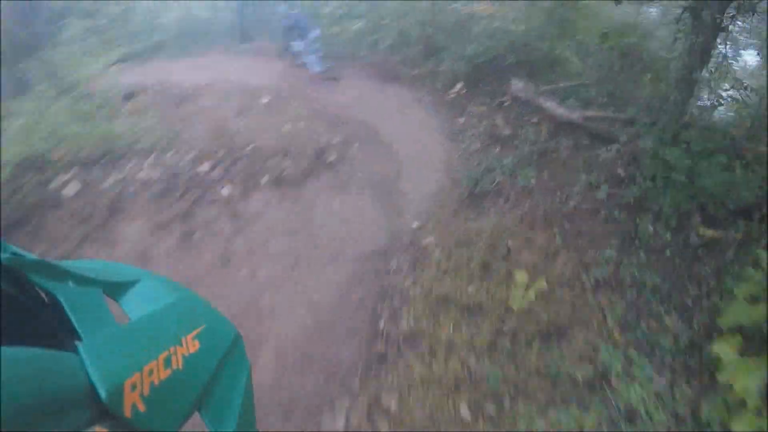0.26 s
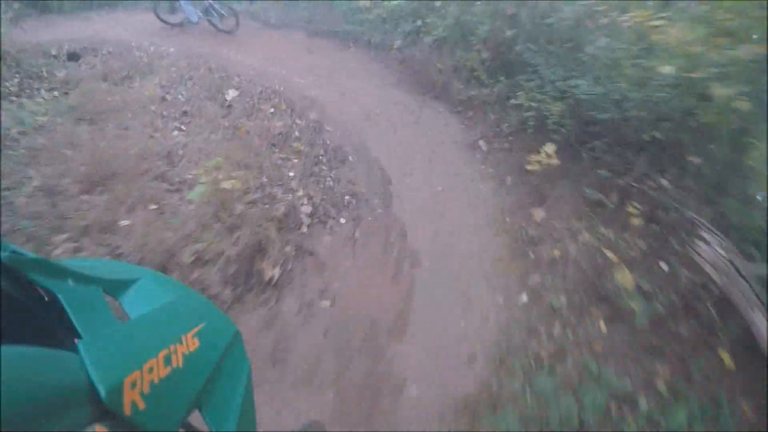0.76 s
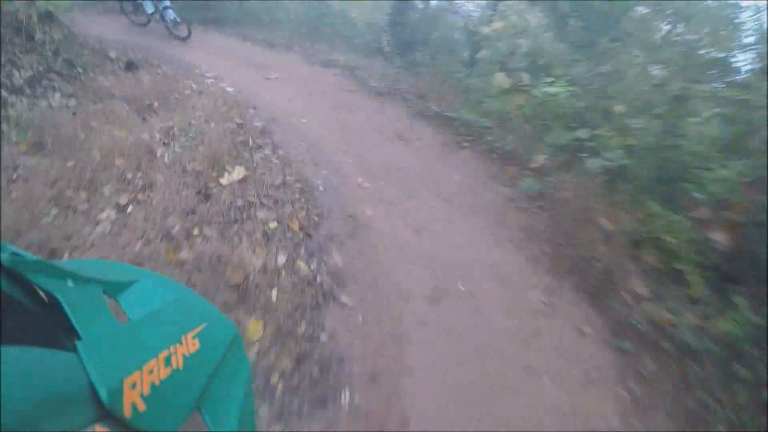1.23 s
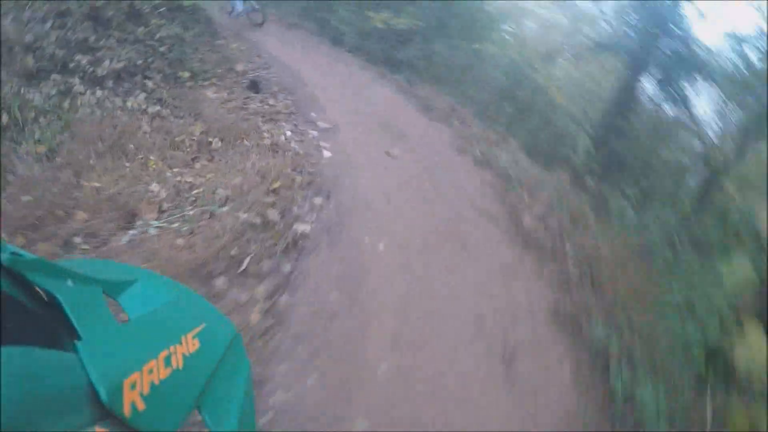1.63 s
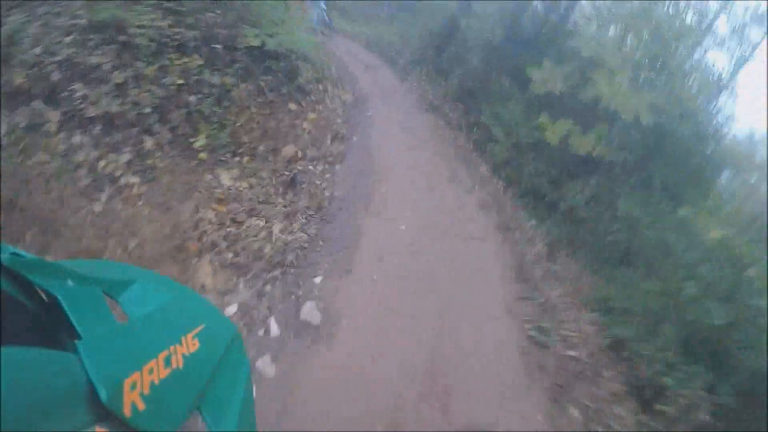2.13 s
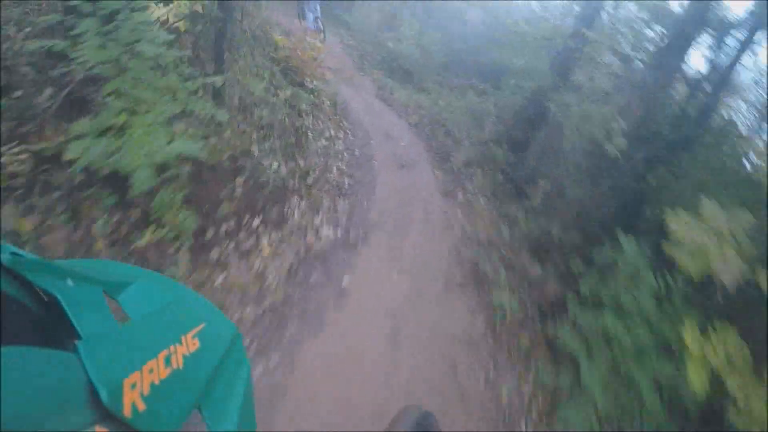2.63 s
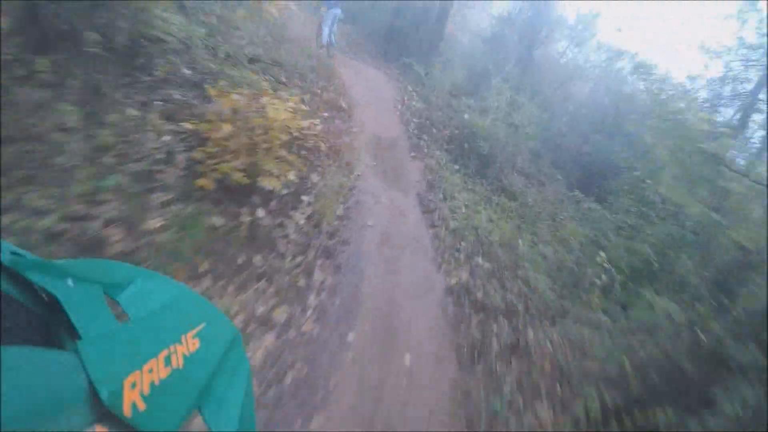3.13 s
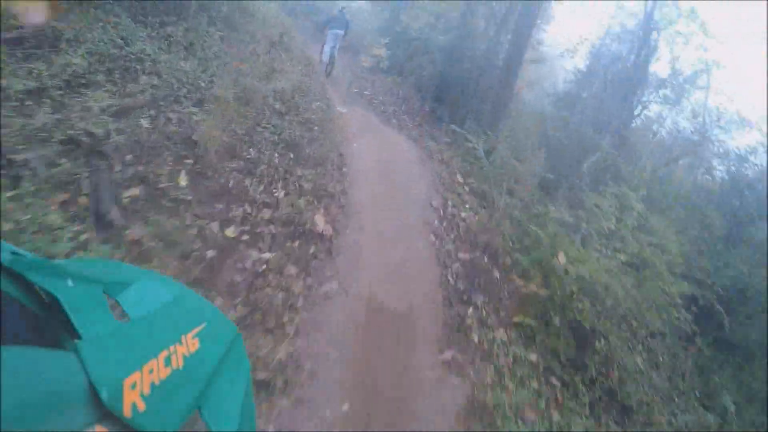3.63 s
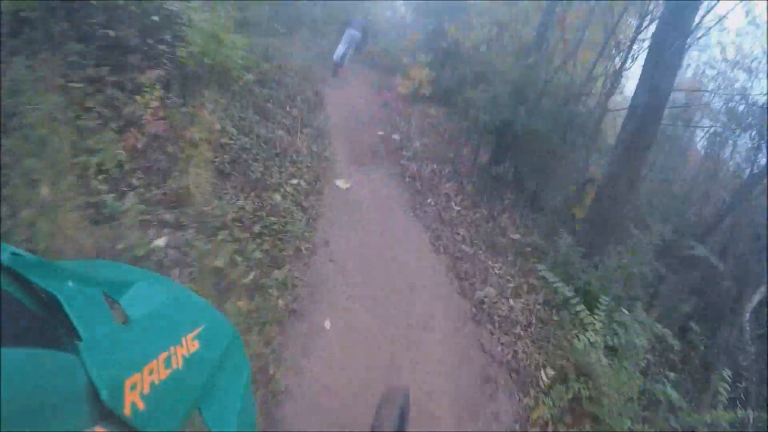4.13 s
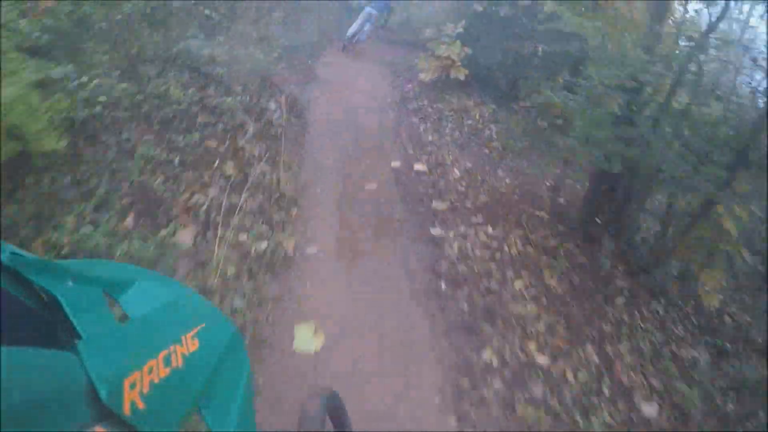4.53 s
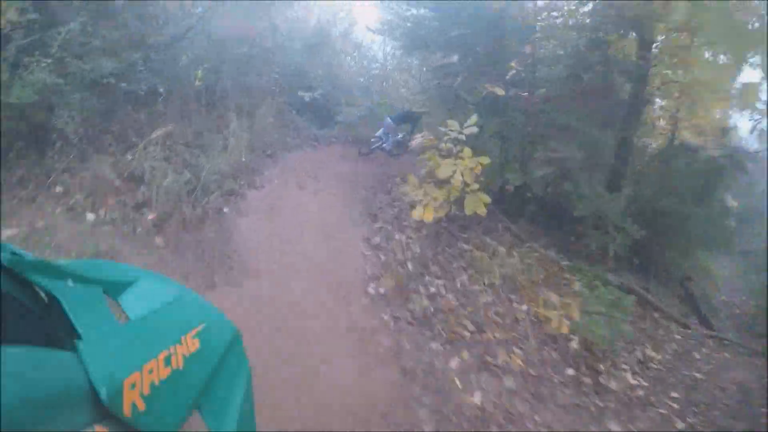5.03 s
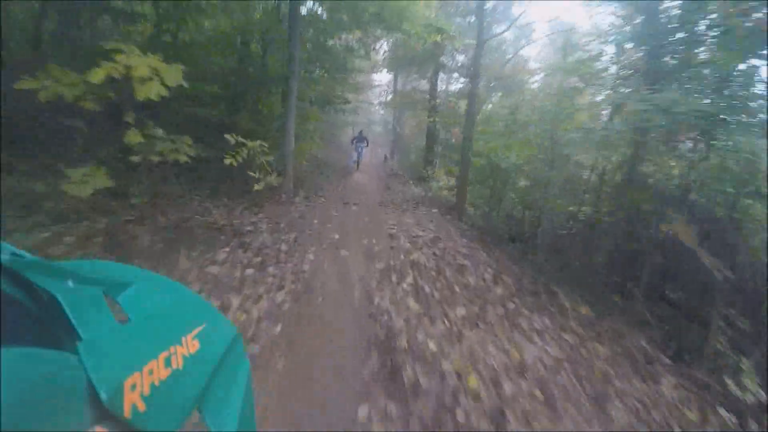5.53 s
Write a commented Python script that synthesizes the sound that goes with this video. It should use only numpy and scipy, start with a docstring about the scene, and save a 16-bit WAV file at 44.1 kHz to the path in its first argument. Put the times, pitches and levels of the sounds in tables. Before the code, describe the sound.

Deep wind buffeting and irregular knocks of a plastic camera case on a coasting mountain bike, the air rush slowly growing louder.

```python
"""Coasting down a dirt trail

A bike is heard from a camera sealed in a plastic case on the rider's helmet. Wind and bumps shake the
helmet in deep throbs. Rushing air and knocks of the mount make the case ring, while the freehub (the
ratchet in the back wheel) ticks softly. Near the end the sound drops out for a moment."""
import sys
import numpy as np
from scipy import signal
from scipy.fft import rfft, irfft, next_fast_len
from scipy.io import wavfile
from scipy.ndimage import uniform_filter1d

SR = 44100
rng = np.random.default_rng(int(sys.argv[2]) if len(sys.argv) > 2 else 0)


def dump_mix(stems):
    """Bounce the given channels to the path in sys.argv[1] as a 16-bit WAV at rate SR."""
    frames = np.atleast_2d(stems).T  # one column per channel
    limited = np.clip(frames, -1, 1)  # hard clip at full scale
    pcm = np.round(limited * 32767).astype(np.int16)
    wavfile.write(sys.argv[1], SR, pcm)


N = 254442

# Knocks of the mount. Hardness lifts the middle and top notes of the case, tone tilts its low notes
# upward, brightness lifts only the top: (time [s], level [dB], hardness [dB], tone [dB], brightness [dB])
MOUNT_KNOCKS = [(0.0102, -25.5, -25, 6, -3), (0.06, -23, -13, 1, -3), (0.1178, -26.5, -11, 2, -3),
                (0.1567, -22.5, -14.5, -4, 1), (0.191, -36, -23, 2, -3), (0.297, -22, -5, -10, -5),
                (0.3496, -30, -17, 9, -3), (0.3844, -28, 7, 8, 7), (0.3881, -17, 7, 7, 6.5),
                (0.3934, -26, -20, 7, -3), (0.4144, -27.5, -3, 13, -6), (0.418, -30.5, -17, 3, -1),
                (0.485, -25, -14, 11, -6), (0.579, -40.5, 4, 0, -12), (0.602, -31, -15, 12, -3),
                (0.834, -33.5, -5, -2, -6), (0.865, -41.5, 2, 3, -9), (0.905, -31.5, -4, -2, -9),
                (0.955, -32, -19, 3, -3), (1.0127, -35, -11, -2, -3), (1.068, -38, -3, 7, -8),
                (1.095, -31.5, -22, -3, -3), (1.2966, -26.5, -19, -1, -3), (1.334, -34, -18, 2, -3),
                (1.401, -30.5, -20, 7, -3), (1.449, -29.5, -11, 1, -3), (1.515, -33, -15, 1, -6),
                (1.6222, -30.5, -30, 0, -3), (1.6636, -31.5, -21, -1, -1), (1.922, -38.5, -15, 5, -3),
                (1.954, -37.5, -6, 6, -3), (2.082, -30.5, -13, 4, -3), (2.244, -26, -15, 5, -1),
                (2.2886, -37, -4, -2, -10), (2.297, -37, -15, -5, -3), (2.352, -33, -13, -2, -3),
                (2.404, -35, -15, -3, -3), (2.43, -27.5, -8, 1, -12), (2.443, -35, -14, 7, -3),
                (2.4592, -41, 2, 3, 4), (2.474, -38, -10, -2, -3), (2.529, -25, -7, 6, -13),
                (2.624, -36, -15, 0, -3), (3.1042, -18.5, -32, -4, -3), (3.112, -18.5, -5.5, -7, -3.5),
                (3.2133, -32.5, -11, 0, -3), (3.638, -26.5, -5, -1, -11), (3.7728, -45, 3, -2, -1),
                (3.8898, -31.5, -10, -4, -5), (3.938, -32.5, -22, 0, -3), (3.9718, -26, -25, -5, -3),
                (4.4067, -23, -7.5, 0, -5), (4.4698, -34.5, -6, 6, 0), (4.642, -34, -2, 2, -3),
                (4.812, -38, 0, -6, -7), (5.0257, -29, -25, 1, -5), (5.258, -37, -2, -2, -3),
                (5.485, -33, -8, -4, -6), (5.498, -38, 3, -2, -15), (5.605, -38, 4, -2, -12),
                (5.618, -41, 7, -3, -6), (5.631, -34, 0, 1, -12), (5.675, -44, 2, -4, -12.5),
                (5.683, -41, 6, 0, -6), (5.692, -37, 12, 0, -12), (5.702, -36, -4, -2, -12),
                (5.743, -41, 5, 2, -12)]
# The case's modes, the notes it rings at. Ring time is how long a note takes to fade by 60 dB:
# (pitch [Hz], ring time [s], level when knocked [dB], level in rushing air [dB])
CASE_MODES = [(1243, 0.052, -6, -14), (1354, 0.031, 2.5, -59), (1467, 0.04, -2, -31),
              (1810, 0.012, 2, -12.5), (2030, 0.0098, -15, 5), (2334, 0.0082, 9, 11.5),
              (2586, 0.0046, -9, -0.5), (2935, 0.024, -6.5, -5), (3170, 0.014, -14, -1),
              (3530, 0.028, -15, -8), (3900, 0.013, -1, -62), (4220, 0.02, -5.5, -53),
              (5240, 0.012, -37, -45), (5990, 0.0073, -8, -22), (6310, 0.0082, -4.5, -29)]
# The note of the hollow inside the case, with the same columns
CAVITY_MODE = (803.5, 0.08, -13, -13)
MIDDLE_FROM_HZ, TOP_FROM_HZ = 1650, 2700  # split the modes into low, middle and top


def undb(db):
    """Turn decibels into a factor to multiply by."""
    return 10 ** (np.asarray(db) / 20)


def level(x, db):
    """Scale a sound to an average (rms) level."""
    return x * undb(db) / np.sqrt(np.mean(x ** 2))


def filtered(x, kind, hz, order=2):
    """Keep the lows, the highs or a band; a higher order cuts more steeply."""
    return signal.sosfilt(signal.butter(order, hz, kind, fs=SR, output="sos"), x)


def ring(x, hz, ring_s):
    """One mode: every click in x starts a fading tone."""
    decay, angle = np.exp(-np.log(1000) / (ring_s * SR)), 2 * np.pi * hz / SR
    return signal.lfilter([0, np.sin(angle)], [1, -2 * decay * np.cos(angle), decay * decay], x)


def fade(kicks, fade_s):
    """Give each kick a tail that falls to about a third in fade_s."""
    return signal.lfilter([1], [1, -np.exp(-1 / (fade_s * SR))], kicks)


def coloured(points):
    """Noise shaped by (frequency [Hz], level [dB]) points."""
    hz, db = np.transpose(points)
    size = next_fast_len(N)
    freqs = np.maximum(np.arange(size // 2 + 1) * SR / size, 1)
    gain = undb(np.interp(np.log(freqs), np.log(hz), db))
    return irfft(rfft(rng.standard_normal(size)) * gain, size)[:N]


def wander(rate):
    """A smooth random curve, about 1 in size, that changes `rate` times a second."""
    hold = int(SR / rate)
    steps = np.repeat(rng.standard_normal(N // hold + 1), hold)
    smooth = uniform_filter1d(uniform_filter1d(steps, hold), hold)[:N]
    return smooth / np.std(smooth)


def curves(tables):
    """Join tables of (time [s], value, ...) and draw a line through each value column."""
    times, *columns = np.vstack(tables).T
    return [np.interp(np.arange(N) / SR, times, column) for column in columns]


def wall(x):
    """The stiff case wall lets little through below its own lowest note."""
    return filtered(x, "highpass", 1104, order=8)


def hiss():
    """A faint high hiss that wavers slightly."""
    # Shape of the hiss: (frequency [Hz], level [dB])
    spectrum = [(2470, -22), (4200, -5), (5690, -2.5), (6530, -0.5), (7670, -7), (15000, -10)]
    return level(coloured(spectrum) * undb(0.76 * wander(21.8)), -66)


def scuffs():
    """Brief soft scrapes in the treble, each a rough swell of noise."""
    # Scrapes: (time [s], relative level [dB], length [ms])
    scrapes = [(0.138, -48, 14), (0.155, -57, 20), (0.57, -59.5, 21), (2.284, -54, 19), (2.454, -53.5, 17),
               (3.07, -53, 29), (3.785, -52, 8.6), (3.803, -50.5, 17), (4.1, -56, 27)]
    out = np.zeros(N)
    t = np.arange(3000) / SR
    for (at, db, ms), noise in zip(scrapes, rng.standard_normal((len(scrapes), len(t)))):
        swell = np.sin(np.pi * np.clip(t * 1000 / ms, 0, 1))
        out[int(at * SR):][:len(t)] += undb(db) * noise * swell
    return 2 * filtered(out * undb(2.8 * wander(300)), "bandpass", (3600, 7150))


def freehub():
    """Small sprung catches (pawls) drop unevenly over the ratchet teeth and chatter briefly."""
    # Notes of the pawls: (pitch [Hz], ring time [s], level [dB])
    pawl_modes = [(6565, 0.011, -4), (6050, 0.0044, -5.5), (4990, 0.0092, -9.5), (8130, 0.0056, -10.5),
                  (10060, 0.0048, -13.5), (11430, 0.0053, -12.5)]
    # Loudness of the ticking: (time [s], level [dB])
    loudness = [(0, -69), (.15, -64.5), (.5, -67), (1.35, -65), (1.65, -63), (2.1, -63), (2.4, -61),
                (2.6, -65), (3.65, -65.5), (4.2, -68), (4.6, -66), (5.38, -71.5), (5.75, -67)]
    (db,) = curves([loudness])
    drops_per_s = 61
    timing, strength = rng.standard_normal((int(N / SR * drops_per_s * 2), 2)).T
    at = (np.cumsum(1 + .16 * timing) * SR / drops_per_s).astype(int)
    drops = np.zeros(N)
    drops[at[at < N]] = undb(2.5 * strength[at < N])
    chatter = fade(drops, 0.0091) + 0.13  # the springs drag on between drops
    ticks = sum(undb(mode_db) * ring(chatter * rng.standard_normal(N), hz, ring_s)
                for hz, ring_s, mode_db in pawl_modes)
    return undb(db) * level(wall(ticks), 0)


def thuds():
    """Soft low thuds: a short swell of noise stirs one quickly fading note."""
    # Thuds: (time [s], peak level [dB], pitch [Hz], rough length [ms])
    bumps = [(0.387, -28.5, 85, 20), (0.389, -37, 214, 20), (1.864, -33.5, 191, 10.3)]
    out = np.zeros(N)
    t = np.arange(3000) / SR
    for (at, db, hz, ms), noise in zip(bumps, rng.standard_normal((len(bumps), len(t)))):
        thud = ring(noise * t * np.exp(-t * 4000 / ms), hz, ring_s=0.013)
        out[int(at * SR):][:len(t)] += undb(db) * thud / np.max(np.abs(thud))
    return out


def wind_rumble(gust_db, quick_db):
    """Swirling air beats on the case, harder in gusts and when the helmet shakes more."""
    # Shape of the rumble: (frequency [Hz], level [dB])
    spectrum = [(35, -68), (60, -3.5), (81, 1), (92, -4.5), (315, -17.5), (719, -23.5), (1000, -23.5),
                (1300, -50), (2200, -120)]
    calm_db, usual_shake_db = -52, -26.5
    db = calm_db + 0.33 * gust_db + 0.15 * (quick_db - usual_shake_db)
    return undb(db) * level(coloured(spectrum) * undb(0.96 * wander(11.5)), 0)


def gravel():
    """Small stones flick up from the tyres: a gain that adds short bursts to the air rush."""
    chances_per_s, stones_per_s = 200, 80
    at, luck, size = rng.random((int(N / SR * chances_per_s), 3)).T
    strength = undb(-9.5 - 3 * np.log(size + 0.017))  # many weak, a few strong
    kicks = np.zeros(N)
    kicks[(at * N).astype(int)] = (luck < stones_per_s / chances_per_s) * strength
    return 1 + fade(kicks, 0.0019)


def rattle():
    """How strongly the loose case buzzes on after each knock; more after hard blows."""
    at, db, hardness_db, *_ = np.transpose(MOUNT_KNOCKS)
    kicks = np.zeros(N)
    kicks[(at * SR).astype(int)] = undb(db - 23.5 + .5 * hardness_db)
    return fade(kicks, 0.018)


def air_rush(air_db, gust_db):
    """Gusty, gritty air rings the case; faster air and rattling make it louder and brighter."""
    drive_db = 20 * np.log10(undb(air_db) + rattle())
    bright_db = -1 + 0.43 * gust_db + 0.55 * (drive_db - air_db)
    crunch_db = 0.5 + 0.031 * gust_db  # faster air is more uneven
    grit = undb(2 * rng.exponential(size=N)) * (rng.random(N) < .05)
    air = rng.standard_normal(N) * (1 + 1.42 * grit) * gravel()
    air *= undb(0.33 * wander(27.8) + crunch_db * wander(79))
    air = signal.lfilter([1], [1, -.6], air)  # air pressure moves a wall less in the treble
    case = 0
    for hz, ring_s, _, mode_db in CASE_MODES:
        flicker_db = 1.5 * wander(30)
        case += level(ring(air, hz, ring_s), mode_db) * undb(flicker_db + bright_db * (hz > TOP_FROM_HZ))
    case = filtered(case, "lowpass", 6050)  # the seal dulls the rush
    hz, ring_s, _, cavity_db = CAVITY_MODE
    cavity = level(ring(air, hz, ring_s), cavity_db)
    return undb(drive_db) * level(wall(case) + cavity, 0)


def knocks():
    """The mount hits the helmet: short rough blows ring the case, and hard ones reach its top notes."""
    at, db, hardness_db, tone_db, bright_db = np.transpose(MOUNT_KNOCKS)[:, :, None]
    treble_db = -5 + 1.155 * hardness_db + bright_db
    blow_ms = 1.29 * np.exp(0.14 * rng.standard_normal(at.shape) - 0.017 * hardness_db)  # hard is short
    t = np.arange(3000) / SR
    progress = t / (np.clip(blow_ms, .7, 4) / 1000)
    blows = rng.standard_normal((len(at), len(t))) * progress * np.exp(-2 * progress)
    blows /= np.sqrt(np.sum(blows ** 2, axis=1, keepdims=True))

    def struck(hz, ring_s, mode_db, tilt_db):
        """One note of the case, rung by every blow."""
        if hz < MIDDLE_FROM_HZ:
            reach_db = tilt_db * (hz - 1360) / 240  # low notes tilt around 1360 Hz
        else:
            reach_db = hardness_db if hz < TOP_FROM_HZ else treble_db
        reach_db = reach_db + 1.63 * rng.standard_normal(at.shape)  # each blow lands somewhere else
        push = filtered(blows, "bandpass", [hz / 1.18, hz * 1.121])
        strength = np.abs(blows @ np.exp(-2j * np.pi * hz * t))[:, None]
        push /= strength + 0.35  # roughly even out the blows at this pitch
        return undb(mode_db + reach_db) * ring(push, hz, 0.6 * ring_s)  # contact shortens the ring

    # a little of each blow gets through without ringing, as a crack and a dry slap
    crack = filtered(blows, "highpass", 7000) * undb(treble_db - 2)
    slap = filtered(blows, "bandpass", (650, 3200)) * undb(hardness_db - 5)
    case = wall(sum(struck(*mode[:3], tone_db) for mode in CASE_MODES))
    cavity = undb(0.85 * hardness_db) * struck(*CAVITY_MODE[:3], tilt_db=0)
    hits = undb(db) * (case + cavity + crack + slap)
    build_up_s = 0.001007
    out = np.zeros(N)
    for start, hit in zip(((at[:, 0] - build_up_s) * SR).astype(int), hits):
        out[start:start + len(t)] += hit[:N - start]
    return out


def helmet_shake(slow_db, quick_db):
    """Gusts and bumps rock the helmet on neck and strap: two deep throbs that never quite rest."""
    # The slow and the quick shake: (centre [Hz], width [Hz])
    bands = [(18, 14.2), (43, 20.7)]
    out = 0
    for (hz, width), db in zip(bands, (slow_db, quick_db)):
        sway = filtered(rng.standard_normal(N + SR), "bandpass", [hz - width / 2, hz + width / 2], 4)
        sway = level(sway[SR:], 0)  # skip the first second, while it builds up
        cycle = int(SR / hz)
        power = uniform_filter1d(uniform_filter1d(sway ** 2, cycle), cycle)
        out += undb(db) * level(sway / np.sqrt(power + 0.019), 0)  # even out the swings
    out += 0.81 * (out ** 2 - uniform_filter1d(out ** 2, SR // 8))  # pushes are sharper than swings back
    # head and helmet are too heavy to follow anything quicker
    return signal.sosfiltfilt(signal.butter(4, 53, fs=SR, output="sos"), out)


def scene():
    """All the sources add up at the one microphone inside the case."""
    # Helmet shaking, before and after the dropout: (time [s], slow shake [dB], quick shake [dB])
    shake_levels = [
        [(0.0, -24, -42), (0.06, -16, -19.5), (0.12, -40, -27), (0.19, -10.5, -18), (0.3, -23, -30.5),
         (0.42, -10, -16), (0.55, -36.5, -26.5), (0.64, -18.5, -21), (0.81, -21, -36), (0.87, -9, -15),
         (0.93, -15, -19), (0.98, -10.5, -15), (1.2, -16, -24.5), (1.27, -18.5, -16), (1.34, -22, -25),
         (1.39, -18.5, -25.5), (1.44, -27.5, -38), (1.54, -14, -25), (2.22, -18, -28), (2.34, -10.5, -17),
         (2.74, -27, -37.5), (3.21, -14.5, -26.5), (3.28, -14, -35), (3.58, -31.5, -25.5), (3.66, -13, -47),
         (3.7, -13, -25), (4.26, -32.5, -33.5), (4.38, -14.5, -23), (4.54, -31, -39), (4.59, -19, -25),
         (5.07, -26.5, -43.5), (5.16, -36, -37), (5.25, -29.5, -32.5), (5.31, -28, -33), (5.38, -18, -44)],
        [(5.43, -18.5, -29), (5.46, -16.5, -24.5), (5.6, -31, -34.5), (5.712, -14.5, -26), (5.76, -29, -38)],
    ]
    # Rushing air, before and after the dropout: (time [s], level [dB])
    air_levels = [
        [(0, -49), (.3, -50.5), (1.2, -51), (1.5, -49.5), (1.9, -51.5), (2.2, -51), (2.56, -51.5),
         (2.61, -46.5), (2.65, -49), (2.7, -45), (2.78, -46.5), (3.14, -42), (3.45, -43), (3.78, -40.5),
         (3.9, -44), (4.26, -44.5), (4.33, -40), (4.58, -44.5), (4.84, -45), (5.28, -47), (5.385, -43)],
        [(5.424, -36), (5.46, -37.5), (5.485, -38), (5.505, -36.5), (5.53, -39), (5.555, -37), (5.588, -42),
         (5.607, -35), (5.645, -40.5), (5.67, -34.5), (5.7, -36.5), (5.76, -35.5)],
    ]
    slow_db, quick_db = (db + 3 * wander(12) for db in curves(shake_levels))
    (air_db,) = curves(air_levels)
    gust_db = air_db + 50  # how far above calm air, which is -50 dB
    air = hiss() + wind_rumble(gust_db, quick_db) + air_rush(air_db, gust_db)
    return (air + helmet_shake(slow_db, quick_db) + freehub() + knocks() + thuds() + scuffs())[None]


def record(dry):
    """The sound drops out abruptly for a moment, and the highest treble is cut."""
    off_s, back_s, top_hz = 5.39050, 5.42383, 15150
    t = np.arange(N) / SR
    on = (t < off_s) | (t >= back_s)
    return signal.sosfilt(signal.ellip(12, .2, 70, top_hz, fs=SR, output="sos"), dry * on)


dry = scene()
out = record(dry)
dump_mix(out)
```